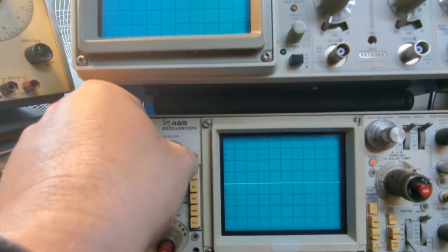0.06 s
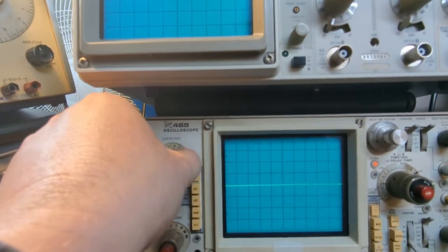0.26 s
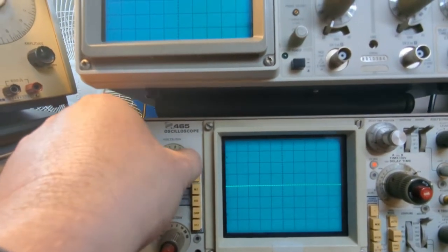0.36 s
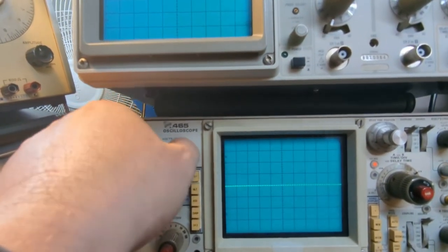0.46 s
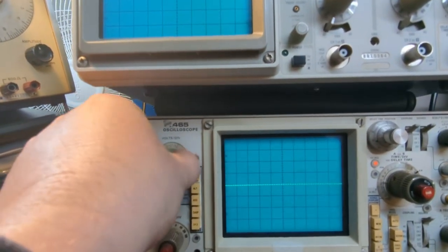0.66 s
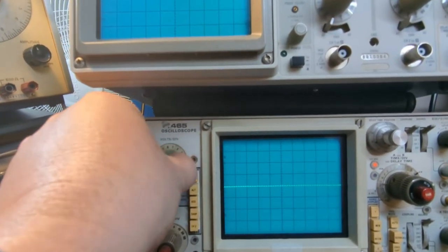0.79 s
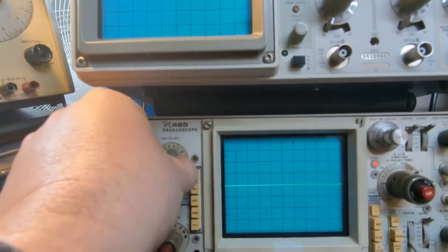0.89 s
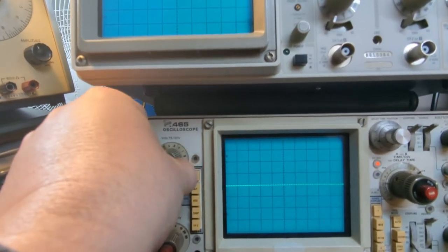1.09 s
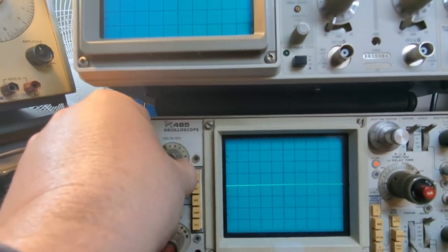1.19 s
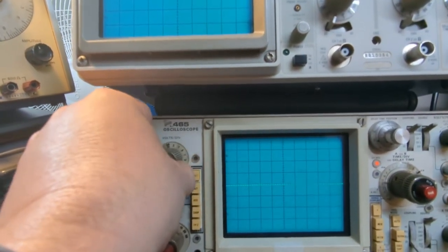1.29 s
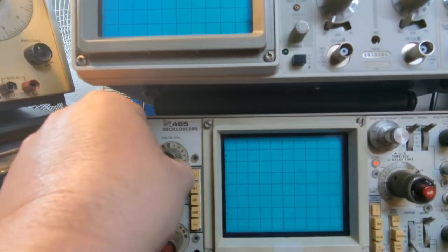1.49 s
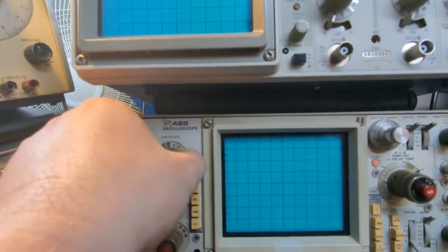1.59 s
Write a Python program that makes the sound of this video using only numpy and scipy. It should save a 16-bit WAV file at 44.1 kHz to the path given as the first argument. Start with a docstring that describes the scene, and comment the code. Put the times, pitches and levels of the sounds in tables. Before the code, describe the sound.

A rotary switch on an oscilloscope clicks five times, close up in a small room. A sharp click comes at 0.2 seconds and the loudest at 0.7, followed by softer ones at about 0.9, 1.0 and 1.3 seconds. Each snap leaves a brief metallic ring that dies quickly. Fingers rub very faintly on the knob, and a quiet fan hum with a low drone continues throughout.

```python
"""At a workbench, close up, an instrument's rotary switch is turned through five clicks.
At each click the contacts snap over in a brief rattle, the spring and the metal case ring,
and the sound dies away in a small room. Fingers rub faintly on the knob between steps.
Behind it all a cooling fan hums, air moves and the cabinets give a low drone."""
import sys
import numpy as np
from scipy import signal
from scipy.fft import rfft, irfft
from scipy.io import wavfile
from scipy.ndimage import uniform_filter1d

SR = 44100
rng = np.random.default_rng(int(sys.argv[2]) if len(sys.argv) > 2 else 0)


def master_out(mix):
    """Clip the mix to full scale and print it as 16-bit PCM to the path in sys.argv[1]."""
    frames = np.transpose(np.atleast_2d(mix))
    ceiling = np.clip(frames, -1, 1)
    pcm = np.round(ceiling * 32767).astype(np.int16)
    wavfile.write(sys.argv[1], SR, pcm)


N = 72765

# The clicks. Each row: start in seconds, gain in dB, then a boost or cut in dB at each TONE_HZ pitch.
CLICKS = [(0.213, -1, -1, 1.5, -1.5, -1.5, 0.5), (0.7083, 0.5, -3, -2.5, -2.5, -2.5, -3),
          (0.8723, -5, 3, -4.5, 1, -3, 3), (1.0461, -5.5, 0.5, 2.5, 0.5, -4.5, -1),
          (1.3391, -7.5, 2, 0, -3.5, 2, 0.5)]
# Five pitches in Hz that shape a click's tone: knock, ring, clack, presence and treble.
TONE_HZ = [530, 830, 2000, 3900, 10000]
# The dense ring of switch and front panel. Each row: pitch in Hz, gain in dB,
# seconds to fade by 60 dB, left over right in dB.
PANEL_BANDS = [(650, -41, 0.023, -1), (1120, -49, 0.029, -6.5), (1620, -40, 0.15, -8),
               (1990, -30.5, .05, -0.5), (2720, -35, 0.067, 0), (3700, -44.5, 0.067, 6),
               (5210, -37.5, .04, -3), (6490, -36, 0.05, 2), (7670, -43, 0.057, 2), (11940, -32, 0.05, 1.5),
               (15500, -30.5, .035, -1)]
# Ringing notes of the spring and contact wafers. Each row: pitch in Hz, gain in dB,
# left over right in dB, head start of the left wave in radians.
SPRING_NOTES = [(3238, -33.5, 6, -2.6), (4170, -40, 2.5, -1), (5450, -39, -1.5, 4), (6260, -32.5, 5, 1),
                (6570, -28.5, -4.5, 4), (6804, -38.5, 0.5, -1.5), (7300, -35, 0, -1.5),
                (10190, -36.5, 0, 5), (10880, -38, 7, 1.5), (11600, -31.5, 1.5, 0.5), (11720, -36, 1, 1.5),
                (14890, -37, 2.5, 0)]
# Ringing notes of the case. Each row: pitch in Hz, gain in dB, seconds to fade by 60 dB,
# left over right in dB, head start of the left wave in radians.
CASE_NOTES = [(482, -47, 0.24, 0.5, -2), (523, -34, .13, -1, -0.5), (591, -35.5, 0.14, -2, -0.5),
              (743.2, -34, 0.13, 1, 0), (890, -38.5, 0.17, -3, 2.15), (933.6, -43.5, 0.26, -4.5, 5.5),
              (1118, -46, 0.1, 5, -0.5), (1303, -47, 0.18, -17, 2.8), (1433, -40, .08, -4, -4.7),
              (1670, -35, 0.09, -2, -2.5), (1960, -27.5, 0.078, -14.5, -2.5), (2002, -35.5, 0.0815, -6, 1),
              (2155, -40.5, 0.065, -10.5, 6.5), (2330, -37.5, 0.045, -4.5, 2), (2320, -34.5, 0.1, 0, 3),
              (2664, -41, .09, 3.5, 2)]
# The room's echo. Each row: pitch in Hz, gain in dB, seconds to fade by 60 dB.
ROOM_BANDS = [(140, -62, 0.74), (241, -61.5, 0.67), (590.3, -53.5, 0.34), (1170, -46, 0.32),
              (1445, -51, 0.18), (2150, -47, 0.34), (2985, -50.5, 0.19), (4070, -54.5, .22),
              (5600, -57, 0.22), (6860, -48.5, 0.19), (7740, -57.5, 0.16), (9500, -53, 0.17),
              (11500, -47, .15), (15000, -47.5, 0.15)]
# How alike both ears hear snaps and rubs. Each row: pitch in Hz, likeness from 0 to 1.
NEAR_LIKENESS = [(300, 0.067), (800, 0.75), (1200, 0.04), (15000, 0.14)]
# Finger rubs. Each row: start in seconds, length in seconds, level in dB.
FINGER_RUBS = [(0.197, .02, -55), (0.402, 0.027, -63.5), (0.537, 0.021, -66.5), (0.595, 0.031, -62),
               (0.696, .016, -46.5), (0.861, 0.019, -46), (1.026, 0.024, -57.5), (1.614, .045, -60.5)]
# The tone of a rub. Each row: pitch in Hz, relative strength in dB.
RUB_TONE = [(400, -20), (1000, -1), (1500, -5), (2000, 0), (2700, -2), (3600, -13), (7000, -20),
            (10000, -32), (15000, -42)]
# The fan's notes. Each row: multiple of the shaft speed, level in dB, left over right in dB.
FAN_NOTES = [(13, -71.5, 0.5), (16, -81.5, -16.5), (17, -79.5, 4), (19, -71, -8), (20, -75.5, 3),
             (23, -73.5, 2.5), (24, -67.5, -2.5), (28, -61.5, 0), (29, -69, 6), (30, -68, -1.5),
             (32, -73.5, -8), (35, -79.5, -8), (36, -69.5, 0.5), (37, -77.5, 3.5), (38, -77, 2),
             (40, -92, 0)]
# The cabinets' drone. Each row: pitch in Hz, level in dB, unsteadiness from 0 to 1.
DRONE_NOTES = [(51, -74, 1), (86.8, -62.5, 0.3), (120.7, -66, 0.5), (146, -71, 0.7)]
# The tone of moving air. Each row: pitch in Hz, relative strength in dB.
AIR_TONE = [(20, -16.5), (40, -5), (100, 5.5), (200, 2.5), (320, -4.5), (550, 3.5), (900, 0), (1200, -8),
            (2200, -12.5), (4000, -25), (6500, -25.5), (10000, -29.5), (16000, -35.5)]
# How alike both ears hear the air. Each row: pitch in Hz, likeness from 0 to 1.
AIR_LIKENESS = [(50, 0.53), (200, 1), (500, .5), (1500, 0.067), (15000, 0.039)]

LEAD_S, SWELL_IN_DB, SWELL_IN_S = .006, -19, .002  # a faint hiss swells just before each snap
RISE_S, BASS_LAG_S = .0016, .0018  # the lag is extra rise time at 1 kHz
CRACK_DB, CRACK_S = 3.5, .003  # first crack of the contacts above the panel's ring
RATTLE_DB, RATTLE_S = 5.5, .004  # unevenness of the contacts
SHARED = .72  # share of the snap's noise that all clicks have in common
SPRING_RISE_S, SPRING_FADE_S = .0015, .042
CASE_RISE_S, CASE_DELAY_S, CASE_CUT_HZ = .0032, .0015, 424  # the case gives out little below the cut
SHAFT_HZ, FAN_WAVER_RAD, FAN_FLUTTER = 26.31, .012, .091
AIR_DB = -62.5


def switch():
    """Five clicks, each shaking the same panel, spring and case."""
    out, case = np.zeros((2, N)), np.zeros((2, N))
    metal = stereo_noise(16384, NEAR_LIKENESS)
    spring = [(hz, db, SPRING_FADE_S, side_db, lead) for hz, db, side_db, lead in SPRING_NOTES]
    for start, db, *tone in CLICKS:
        add(out, start - LEAD_S, amp(db) * snap(metal, tone))
        add(out, start, amp(db) * ring(spring, SPRING_RISE_S, tone))
        add(case, start + CASE_DELAY_S, amp(db) * ring(CASE_NOTES, CASE_RISE_S, tone))
    bass_cut = signal.butter(6, CASE_CUT_HZ, "high", fs=SR, output="sos")
    return out + signal.sosfilt(bass_cut, case)


def snap(metal, tone):
    """A faint hiss swells briefly, the contacts crack home, and panel and room ring out."""
    size = metal.shape[1]
    t = np.arange(size) / SR - LEAD_S
    after = np.maximum(t, 0)
    jitter = unit(uniform_filter1d(rng.standard_normal(size), size=24))
    rattle = amp(RATTLE_DB * np.exp(-after / RATTLE_S) * jitter)
    noise = np.sqrt(SHARED) * metal + np.sqrt(1 - SHARED) * stereo_noise(size, NEAR_LIKENESS)
    swell_in = amp(SWELL_IN_DB) * np.exp(np.minimum(t, 0) / SWELL_IN_S) * np.minimum(1 + t / LEAD_S, 1)
    out = np.zeros((2, size))
    for band, (hz, db, fade_s, side_db) in zip(bands(noise * rattle, PANEL_BANDS), PANEL_BANDS):
        rise_s = RISE_S + BASS_LAG_S * 1000 / hz
        onset = np.maximum(np.minimum(after / rise_s, 1) ** 1.5, swell_in)
        past_peak = np.maximum(t - rise_s, 0)
        fade = amp(CRACK_DB * np.exp(-past_peak / CRACK_S) - 60 * past_peak / fade_s)
        out += band * onset * fade * amp(db) * pan(side_db) * tone_gain(hz, tone)
    return out + room_echo(after, tone)


def ring(notes, rise_s, tone):
    """Struck metal rings at its own notes, each a little louder or softer every time."""
    t = np.arange(0, .35, 1 / SR)
    out = np.zeros((2, len(t)))
    for hz, db, fade_s, side_db, lead in notes:
        level_db = db + 1.5 * rng.standard_normal() - 60 * t / fade_s
        wave = np.sin(2 * np.pi * (hz * t + rng.random()) + np.array([[lead], [0]]))
        out += wave * amp(level_db) * pan(side_db) * tone_gain(hz, tone)
    return out * np.minimum(t / rise_s, 1)


def room_echo(t, tone):
    """The small room answers a snap with a wash of noise; the bass lasts longest."""
    noise = stereo_noise(len(t), NEAR_LIKENESS)
    swell = np.minimum(t / .0092, 1)
    return sum(band * swell * amp(db - 60 * t / fade_s) * tone_gain(hz, tone)
               for band, (hz, db, fade_s) in zip(bands(noise, ROOM_BANDS), ROOM_BANDS))


def fingers():
    """Dull rubbing that swells and fades as the grip on the knob shifts."""
    t = np.arange(N) / SR
    grip = sum(amp(db) * np.sin(np.pi * np.clip((t - start) / length, 0, 1) ** .82)
               for start, length, db in FINGER_RUBS)
    return grip * shaped_noise(RUB_TONE, NEAR_LIKENESS)


def fan():
    """The fan hums at multiples of its shaft speed, wavering and fluttering slightly."""
    turns = SHAFT_HZ * np.arange(N) / SR + FAN_WAVER_RAD * narrow_noise(0, width_hz=5) / (2 * np.pi)
    out = np.zeros((2, N))
    for multiple, db, side_db in FAN_NOTES:
        wave = np.sin(2 * np.pi * (multiple * turns + rng.random()))
        flutter = 1 + FAN_FLUTTER * narrow_noise(0, width_hz=5.5)
        out += amp(db) * pan(side_db) * unit(wave * flutter)
    return out


def air():
    """Moving air makes a soft, low rush."""
    return amp(AIR_DB) * shaped_noise(AIR_TONE, AIR_LIKENESS)


def cabinets():
    """The cabinets drone on low, unsteady notes."""
    t = np.arange(N) / SR
    out = np.zeros(N)
    for hz, db, unsteady in DRONE_NOTES:
        wave = np.sin(2 * np.pi * (hz * t + rng.random()))
        out += amp(db) * unit(wave + unsteady * narrow_noise(hz, width_hz=12))
    return out


def amp(db):
    """Turns decibels into a gain."""
    return 10 ** (np.asarray(db) / 20)


def unit(x):
    """Scales a sound to an average strength (rms) of 1."""
    return x / np.sqrt(np.mean(x ** 2) + 1e-20)


def value_at(points, hz):
    """Looks up a pitch in a table, gliding between the rows."""
    pitches, values = np.transpose(points)
    return np.interp(np.log(hz + 1), np.log(pitches + 1), values)


def tone_gain(hz, tone):
    """How much one click boosts or cuts a pitch."""
    return amp(value_at(list(zip(TONE_HZ, tone)), hz))


def pan(db):
    """Left and right gains that lie db apart."""
    return amp(np.array([[db], [-db]]) / 2)


def add(mix, start_s, sound):
    """Mixes a stereo sound in at its start time."""
    part = mix[:, max(round(start_s * SR), 0):][:, :sound.shape[1]]
    part += sound[:, :part.shape[1]]


def bands(noise, table):
    """Splits noise into equally strong, overlapping bands around the table's pitches."""
    size, spectrum = noise.shape[1], rfft(noise)
    hz = np.fft.rfftfreq(size, 1 / SR)
    centres = [row[0] for row in table]
    bass_cut = np.minimum(hz / centres[0], 1) ** 5
    shapes = [value_at(list(zip(centres, pick)), hz) for pick in np.eye(len(table))]
    return [unit(irfft(spectrum * bass_cut * shape, size)) for shape in shapes]


def narrow_noise(hz, width_hz):
    """Noise close to one pitch; at 0 Hz, a slow wander."""
    distance = 2 * (np.fft.rfftfreq(N, 1 / SR) - hz) / width_hz
    return unit(irfft(rfft(rng.standard_normal(N)) / (1 + distance ** 2), N))


def stereo_noise(size, likeness):
    """Hiss for two ears, as alike at each pitch as the table says."""
    left, other = rfft(rng.standard_normal((2, size)))
    alike = np.clip(value_at(likeness, np.fft.rfftfreq(size, 1 / SR)), -1, 1)
    right = alike * left + np.sqrt(1 - alike ** 2) * other
    return irfft(np.array([left, right]), size)


def shaped_noise(tone_table, likeness):
    """Stereo noise with the tone a table gives it."""
    gain = amp(value_at(tone_table, np.fft.rfftfreq(N, 1 / SR)))
    return unit(irfft(rfft(stereo_noise(N, likeness)) * gain, N))


def scene():
    """The switch and fingers over the steady hum of the bench."""
    return switch() + fingers() + fan() + air() + cabinets()


def record(dry):
    """Cuts the highest treble, above 15900 Hz."""
    treble_cut = signal.firwin(301, 15900, window=("kaiser", 8), fs=SR)
    return signal.oaconvolve(dry, treble_cut[None], "same")


dry = scene()
out = record(dry)
master_out(out)
```